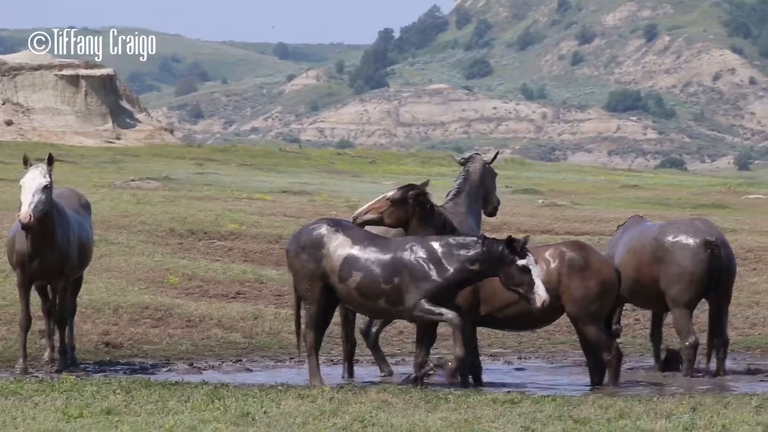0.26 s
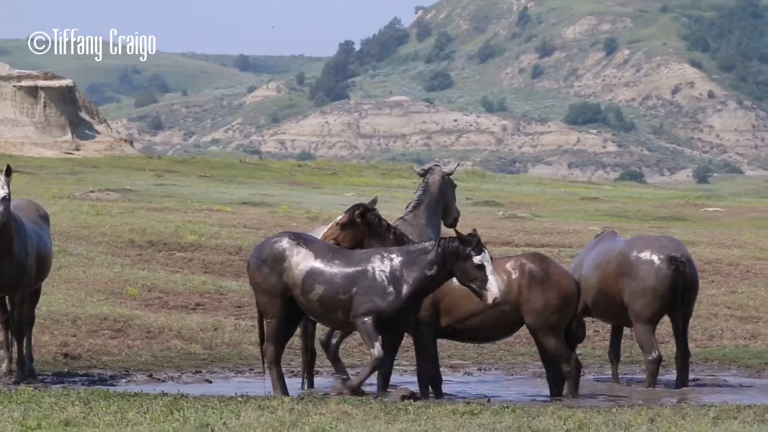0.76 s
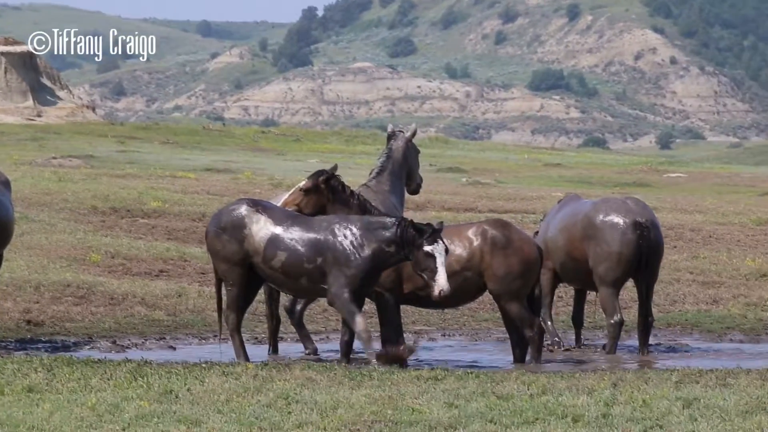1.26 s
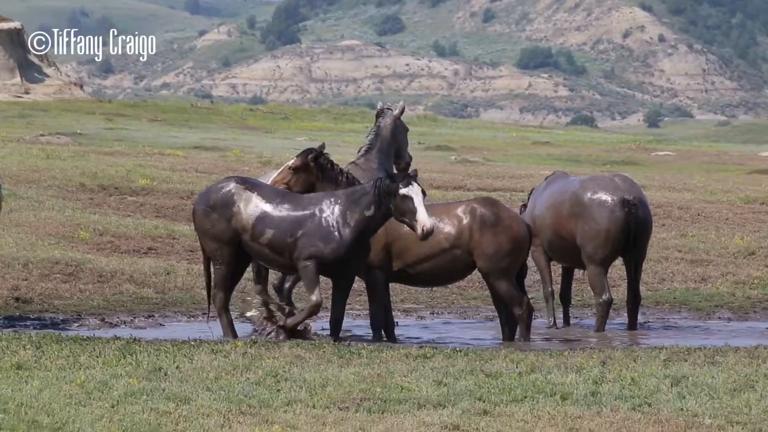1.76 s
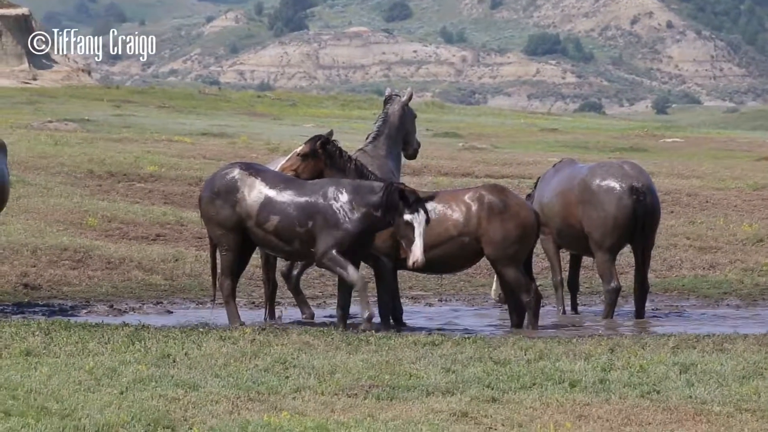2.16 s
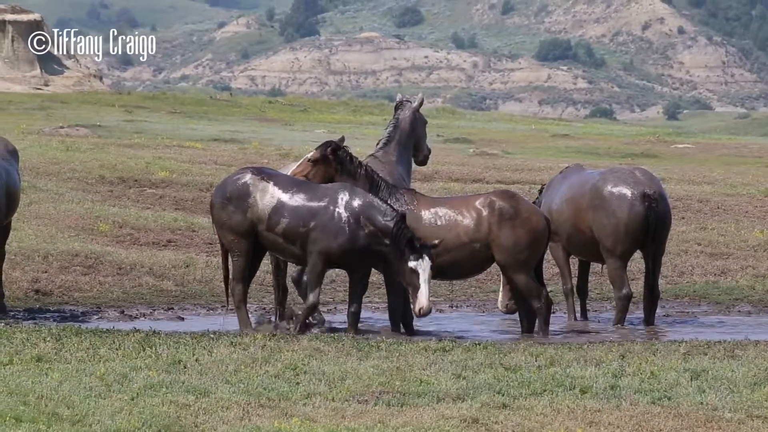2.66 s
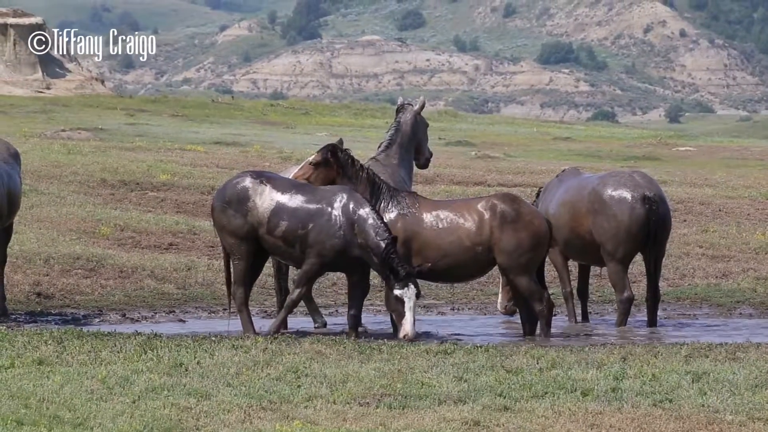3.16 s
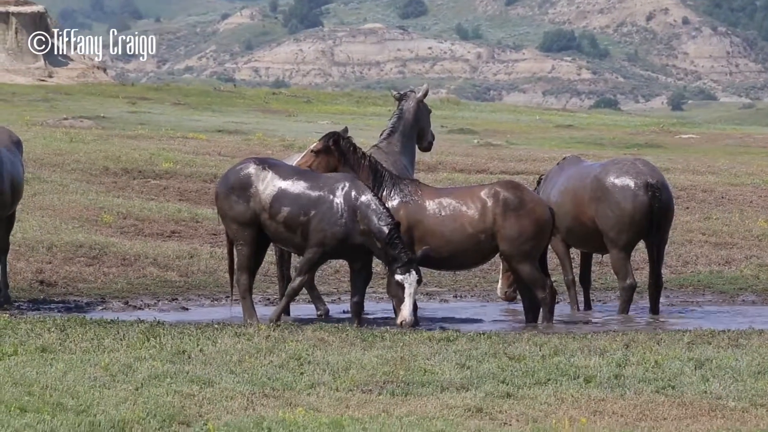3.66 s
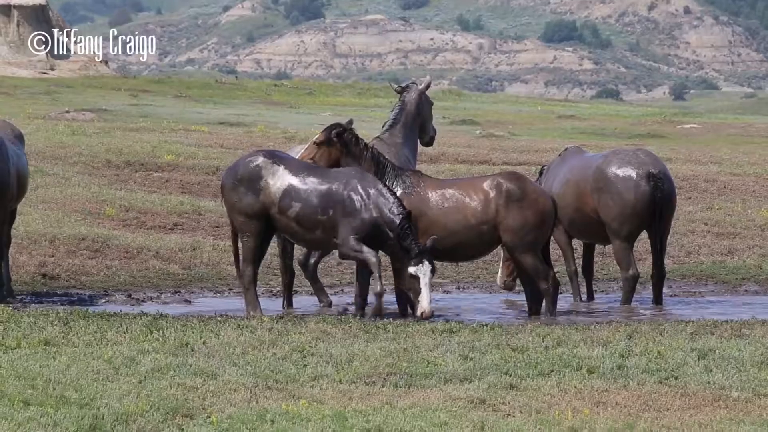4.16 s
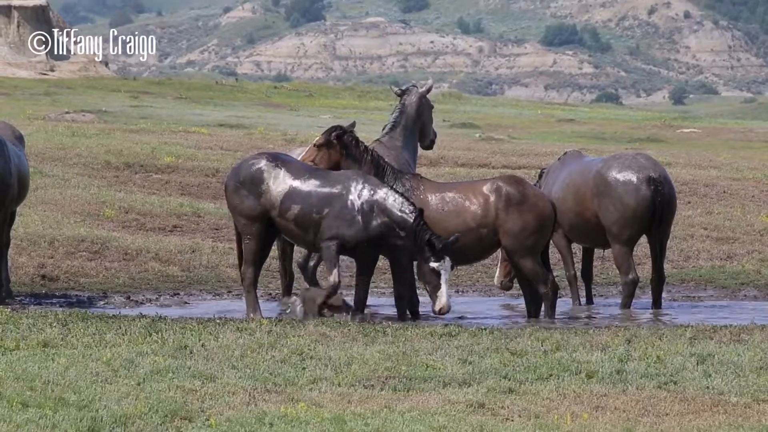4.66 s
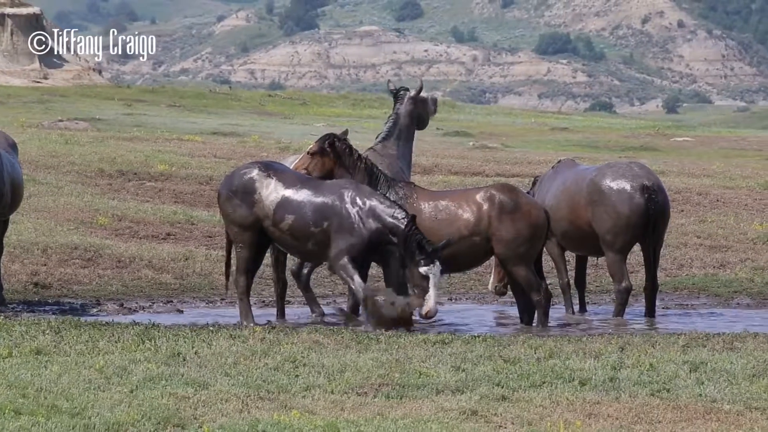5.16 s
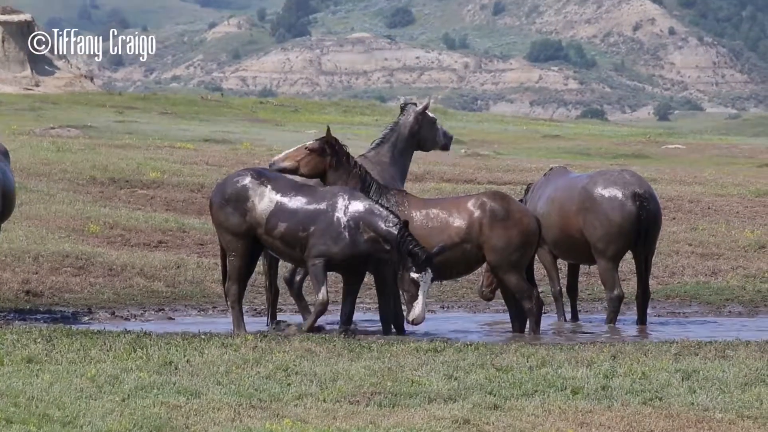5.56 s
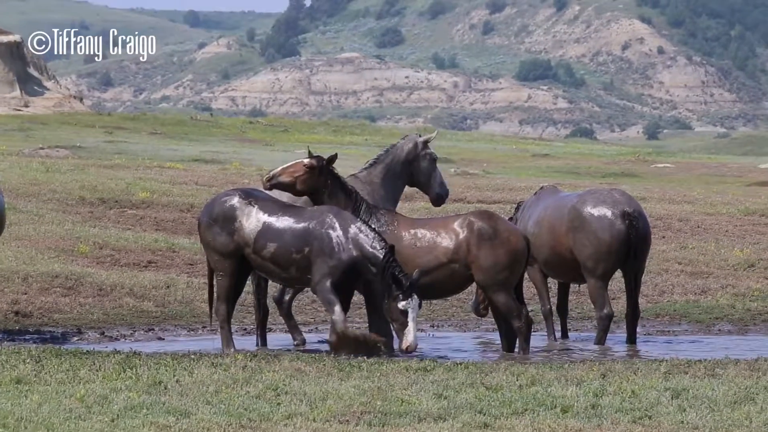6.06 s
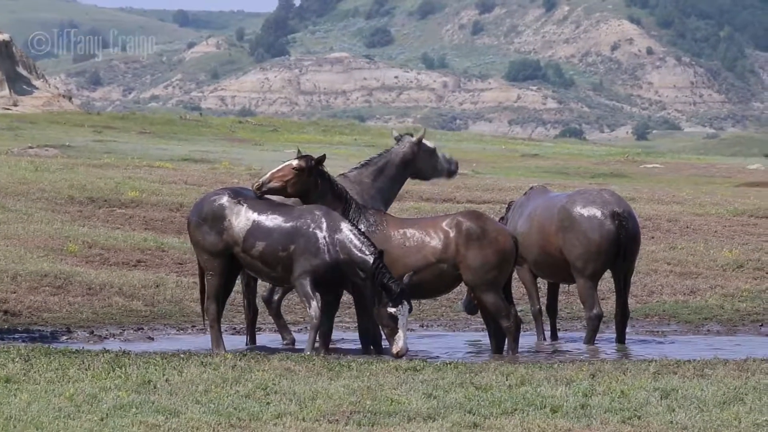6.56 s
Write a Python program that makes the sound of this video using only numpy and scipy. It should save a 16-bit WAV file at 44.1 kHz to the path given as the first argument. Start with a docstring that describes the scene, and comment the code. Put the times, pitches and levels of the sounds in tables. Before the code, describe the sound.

Short high chirps, each a twentieth of a second and slightly falling at the end, repeat steadily in the foreground. Horses paw mud and water behind them: splashy swishes, low bubbling plops, a few wet slaps and faint soft thuds. The outdoor space is open and nearly dry, with faint distant whistles. Close handling-like ticks, resonant whirring, hiss and a very high steady tone come from the camera.

```python
"""Prairie dog alarm by a muddy pool

Open grassland: a prairie dog barks about three times a second, arched whistles with a higher second voice.
Horses paw a pool: puffs of shaped noise slosh and spray, rising tones plop, bursts slap, low swings thud.
Close to the microphone the camera's drive whirrs as resonant noise; short dry ticks fall over it, and its
circuit whines high up, a steady tone. Faint whistles come from far off; shaped noise makes the light wind
and the microphone's hiss."""
import sys
import numpy as np
from scipy import signal
from scipy.fft import rfft, irfft, next_fast_len
from scipy.io import wavfile
from scipy.ndimage import uniform_filter1d

SR = 44100
rng = np.random.default_rng(int(sys.argv[2]) if len(sys.argv) > 2 else 0)


def pcm_store(signal):
    """Save signal as 16-bit PCM."""
    levels = np.round(np.clip(np.atleast_2d(signal), -1, 1) * 32767)
    wavfile.write(sys.argv[1], SR, levels.astype(np.int16).T)


N = 299880


def undb(db):
    """Gain of a level in dB."""
    return 10 ** (np.asarray(db) / 20)


def unit(x):
    """Scale to rms 1."""
    return x / np.sqrt(np.mean(x ** 2))


def colour(x, points):
    """Shape a spectrum by (frequency [Hz], gain [dB]) points, joined on a log frequency axis."""
    hz, db = np.transpose(points)
    size = next_fast_len(N)
    axis = np.log(np.arange(size // 2 + 1) * SR / size + 1)
    gain = undb(np.interp(axis, np.log(hz), db))
    return irfft(rfft(x, size) * gain, size)[:N]


def walk(rate, count=N):
    """Random levels held 1 / rate s and slewed twice; spread near 1."""
    k = int(SR / rate)
    steps = np.repeat(rng.standard_normal(count // k + 1), k)
    return 1.3 * uniform_filter1d(uniform_filter1d(steps, k), k)[:count]


def grains(per_s, spread_db, smear_s):
    """Noise broken into short puffs of uneven size, whose energy fades over smear_s."""
    where = rng.random(N)
    size = np.minimum(rng.exponential(size=N), 2.5)
    hits = (where < per_s / SR) * undb(2 * spread_db * size)
    keep = np.exp(-1 / (smear_s * SR))
    envelope = np.sqrt(signal.lfilter([1], [1, -keep], hits))
    return envelope * rng.standard_normal(N)


def add(out, s, x):
    """Mix x into out at time s."""
    i = max(int(s * SR), 0)
    out[i:i + len(x)] += x[:N - i]


# Resonances of the camera body: (frequency [Hz], width of one pass [Hz], gain [dB])
HOUSING = [(381, 160, 1), (487.4, 194, 6), (621, 138, -0.5), (1639.3, 149, 6), (2356, 151, 0.5),
           (2757, 133, 1), (3460, 177, -3), (4200, 900, -68)]


def housing(x):
    """The resonances of the camera body, each applied twice so the valleys stay dark."""
    out = 0
    for hz, width, db in HOUSING:
        b, a = signal.iirpeak(hz, hz / width, SR)
        once = signal.lfilter(b, a, x)
        out = out + undb(db) * signal.lfilter(b, a, once)
    return out


# Stirring of the pool, levels before surges and body ring:
# (time [s], slosh level [dB], spray level [dB], churned mud level [dB])
POOL = [(0.0, -57.5, -56, -78), (0.3, -51.5, -56, -80), (0.55, -54.5, -59, -84), (0.87, -54, -59.5, -61),
        (1.12, -49.5, -59, -58), (1.35, -56, -57, -67), (1.7, -58.5, -62.5, -63), (2.06, -51, -53, -60.5),
        (2.48, -58.5, -58, -70.5), (2.9, -54.5, -54, -51), (3.11, -55, -54, -60.5), (3.45, -62.5, -67, -69),
        (4.05, -61, -73, -65.5), (4.49, -59.5, -62.5, -65), (4.98, -53, -60, -58.5),
        (5.27, -54, -53.5, -66), (5.68, -58, -64, -56), (5.95, -54, -59, -62), (6.2, -55, -57, -72),
        (6.45, -57, -68.5, -62.5), (6.8, -58, -63.5, -70)]
# Spectra of the moving water and of the fine spray: (frequency [Hz], relative gain [dB])
SLOSH = [(100, -28), (250, -2), (500, -2.5), (1000, -3), (2000, -1.5), (3800, -7), (4700, -17.5),
         (5300, -49), (9000, -29)]
SPRAY = [(2000, 2.5), (4400, 1), (5300, -6), (6500, -3), (9000, -6), (12000, -14), (15000, -32)]
MUD = [(40, -39), (90, -8.5), (220, 2), (400, 0.5), (2000, -24)]  # (frequency [Hz], relative gain [dB])
SURGE_DB, SURGES_PER_S = 2, 18  # the water comes in uneven surges


def pool():
    """Hooves stir the pool: sloshing, fine spray and a low churn of mud, each made of noise puffs."""
    s, *columns = np.transpose(POOL)
    t = np.arange(N) / SR
    slosh_db, spray_db, mud_db = (np.interp(t, s, c) + SURGE_DB * walk(SURGES_PER_S) for c in columns)
    water = colour(grains(600, spread_db=5.0, smear_s=0.0088), SLOSH)
    # the camera body rings along and lends the water its colour
    slosh = (unit(water) + 0.57 * unit(housing(water))) * undb(slosh_db)
    spray = unit(colour(grains(900, spread_db=0.5, smear_s=0.0034), SPRAY)) * undb(spray_db)
    mud = unit(colour(grains(110, spread_db=0.5, smear_s=0.038), MUD)) * undb(mud_db)
    return slosh + spray + mud


# Spectrum of wind and hiss at the microphone: (frequency [Hz], relative gain [dB])
AIR = [(20, -13), (45, 2), (72, 7.5), (110, 3.5), (250, -6), (700, 2), (1000, -27), (1400, 6.5),
       (2000, -34), (4000, -68), (5200, -21.5), (13000, -22), (14300, -21), (14800, -26), (15200, -28)]
AIR_DB = -63.5  # rms


def air():
    """Light wind over the plain and the hiss of the microphone: steady shaped noise."""
    return unit(colour(rng.standard_normal(N), AIR)) * undb(AIR_DB)


FAINT_TICKS_PER_S, FIRST_TICK_S, TICK_JITTER_S = 23.44, 0.006, 0.003
FAINT_SNAP_DB, FAINT_RING_DB, FAINT_SPREAD_DB = -54.5, -45, 2.5  # before the tick's colouring


def faint_ticks():
    """One faint tick of random size about every 43 ms."""
    times = np.arange(FIRST_TICK_S, N / SR, 1 / FAINT_TICKS_PER_S)
    late, snap, ring = rng.standard_normal((len(times), 3)).T
    times = times + TICK_JITTER_S * late
    snap_db = FAINT_SNAP_DB + FAINT_SPREAD_DB * snap
    ring_db = FAINT_RING_DB + FAINT_SPREAD_DB * ring
    return list(zip(times, snap_db, ring_db))


# Louder short ticks, levels before colouring:
# (time [s], dry snap level [dB], level sent through the resonances [dB])
TICKS = [(0.2134, -44, -45), (0.379, -46, -29), (0.4179, -46, -46), (0.5104, -45, -36),
         (0.7307, -39.5, -27), (0.835, -41.5, -46), (1.227, -44, -32), (1.249, -42, -30),
         (1.4117, -40, -26.5), (1.4722, -34, -46), (1.499, -43, -48), (1.6181, -42, -26),
         (1.7977, -41, -46), (1.838, -37.5, -46), (1.8775, -42, -23.5), (1.924, -41, -39),
         (1.9866, -43, -46), (2.2591, -42, -29), (2.6435, -41, -55), (3.197, -39, -49),
         (3.2869, -41.5, -27), (3.4287, -41, -29), (3.5458, -44, -30.5), (3.8049, -43.5, -26),
         (3.979, -43.5, -31), (4.099, -43.5, -54), (4.2268, -43, -30), (4.4413, -44, -45),
         (4.4588, -41, -50), (4.567, -43.5, -30), (4.6055, -40, -24), (4.823, -43, -44), (5.4814, -46, -56),
         (5.7203, -41, -48), (6.099, -44, -25), (6.1413, -42, -40), (6.4918, -43, -50), (6.5336, -43, -28),
         (6.6612, -44, -49), (6.7431, -40.5, -36)]
SNAP = [(1000, 8.5), (2500, 20.5), (4500, 7.5), (6000, 6), (10000, -2.0), (14000, -4)]  # (frequency [Hz], gain [dB])
RING = [(600, 2.3), (1500, 10.5), (4000, 8.9)]  # (frequency [Hz], gain [dB])
CHATTER_S = 0.0026  # fade of a tick's chatter
WHIRR_DB, WHINE_DB, WHINE_HZ = -54.5, -54.5, 15620.6  # mean rms levels, before their slow wander


def camera():
    """Close by, the camera's drive whirrs; short dry ticks fall over it, and its circuit whines."""
    rattle = unit(housing(grains(500, spread_db=2.0, smear_s=0.0012)))
    whirr = rattle * undb(WHIRR_DB + 1.0 * walk(2.86))
    snap, ring = np.zeros(N), np.zeros(N)
    t = np.arange(800) / SR
    for s, snap_db, ring_db in TICKS + faint_ticks():
        puff = .3 * rng.standard_normal(len(t)) * np.exp(-t / CHATTER_S)
        puff[0] = 1  # one sharp edge, then a little chatter
        add(snap, s, undb(snap_db) * puff)
        add(ring, s, undb(ring_db) * puff)
    snap = colour(snap, SNAP)
    ring = housing(colour(ring, RING))
    tone = np.sqrt(2) * np.sin(2 * np.pi * WHINE_HZ * np.arange(N) / SR)
    whine = undb(WHINE_DB + .45 * walk(5.1)) * tone
    return whirr + snap + ring + whine


# Soft low thuds on the ground: (time [s], pitch [Hz], level [dB])
THUDS = [(0.044, 55, -53), (0.442, 54, -58), (0.826, 55, -57), (2.867, 50, -53), (3.962, 50, -56),
         (4.978, 55, -57), (5.3, 60, -59), (6.536, 90, -56), (6.639, 89, -53)]
THUD_S = 0.045


def thuds():
    """Hooves set down on soft ground: two to four slow swings each, swelling and dying away."""
    out = np.zeros(N)
    for s, hz, db in THUDS:
        t = np.arange(int(THUD_S * SR)) / SR
        swell = np.sin(np.pi * t / THUD_S) ** 2
        add(out, s, undb(db) * swell * np.sin(2 * np.pi * hz * t))
    return out


SCATTER_DB, SCATTER_S = -25.5, 0.019  # level and fade of the return


def scatter(x):
    """Grass and mounds return a faint, short smear."""
    t = np.arange(int(5 * SCATTER_S * SR)) / SR
    tail = rng.standard_normal(len(t)) * np.exp(-t / SCATTER_S)
    tail = tail / np.linalg.norm(tail)
    return x + undb(SCATTER_DB) * signal.fftconvolve(x, tail)[:N]


# Barks across the grass, levels before the throat's dip: (time [s], length [s], top pitch [Hz],
# last pitch [Hz], first partial's level [dB], partials 2, 3 and 4 against the first [dB] x 3,
# second voice's level mid-bark [dB])
BARKS = [(0.2605, 0.054, 2248, 1896, -28, -3, -20, -41, -12.5),
         (0.6209, 0.051, 2216, 1860, -26, -2.5, -17.5, -32, -15.5),
         (0.9248, 0.054, 2244, 1866, -26.5, -1.5, -17.5, -34, -16.5),
         (1.2846, 0.051, 2219, 1865, -25.5, -1.5, -16.5, -35, -16),
         (1.65, 0.049, 2214, 1920, -28, 0.5, -13.5, -27.5, -17),
         (2.027, 0.045, 2181, 1940, -28, 1, -10, -26.5, -15.5),
         (2.377, 0.051, 2187, 1975, -26.5, 0.5, -14.5, -29.5, -17),
         (2.6974, 0.047, 2230, 1890, -25, -2, -18, -36, -18.5),
         (3.0367, 0.044, 2206, 1900, -25.5, -1.5, -19.5, -47, -21),
         (3.37, 0.048, 2160, 1920, -26.5, -2.5, -21.5, -39.5, -18),
         (3.687, 0.043, 2147, 2090, -27.5, -2, -18, -34, -22),
         (4.348, 0.043, 2125, 2090, -26.5, -1.5, -16, -24, -27),
         (4.6765, 0.0435, 2062, 2010, -30, -1.5, -18.5, -26.5, -15.5),
         (4.999, 0.043, 2150, 2020, -25.5, -7.5, -22.5, -35, -19),
         (5.297, 0.047, 2123, 1990, -27, -10.5, -21.5, -31, -15.5),
         (5.607, 0.049, 2084, 1910, -28, -8.5, -20, -39, -15),
         (5.9453, 0.042, 2028, 1940, -31, -8, -21.5, -29.5, -11.5),
         (6.2461, 0.041, 2086, 2125, -26.5, -6.5, -21.5, -29, -16),
         (6.556, 0.045, 2128, 1840, -24.5, -7.5, -20, -34.5, -16.5)]
# A dip in the throat above the second partial: (frequency [Hz], gain [dB])
THROAT = [(3000, -2), (4900, 0), (5400, -14), (5900, -1.5), (6200, -1)]
# Partials 5 and 6 against the mean of the third and fourth: (level [dB], level [dB])
TOP_PARTIALS_DB = [-12, -21.5]
SCOOP_HZ = 103  # the main arch starts this far under its top
SECOND_SHARE = 0.238  # second voice above the first, as a share of the pitch
SECOND_GROWS_DB = 3  # its growth over each half of a bark


def prairie_dog(top_at=.35, breath_db=-19.5):
    """Arched whistle-like barks; a second, higher voice puts a side tone above every partial."""
    out = np.zeros(N)
    for s, length, top_hz, last_hz, db, *upper_db, voice2_db in BARKS:
        u = np.arange(int(length * SR)) / (length * SR)  # 0 to 1 over the bark
        count = len(u)
        rising = u < top_at
        edge_hz = np.where(rising, top_hz - SCOOP_HZ, last_hz)
        reach = np.where(rising, (top_at - u) / top_at, (u - top_at) / (1 - top_at))
        arch = reach ** np.where(rising, 2.6, 2.1)
        hz = top_hz + (edge_hz - top_hz) * arch + 12 * walk(349, count=count)
        # quick scoop up at the start; flat barks hook down at the very end
        hook_hz = max(260 - 1.0 * (top_hz - last_hz), 0)
        hz -= np.where(rising, 50, hook_hz) * reach ** 7
        phase = 2 * np.pi * np.cumsum(hz) / SR
        beat = 2 * np.pi * np.cumsum(SECOND_SHARE * hz + 60 * walk(400, count=count)) / SR

        # the second voice fades in over the first quarter; a weaker mirror tone lies below
        second_db = voice2_db + SECOND_GROWS_DB * (2 * u - 1)
        second = undb(second_db + 2.5 * walk(250, count=count)) * np.clip(u / .25, 0, 1)
        wobble = 1 + second * (np.exp(1j * beat) + 0.22 * np.exp(-1j * beat))
        fade_in = np.sin(np.pi / 2 * np.clip(u / 0.11, 0, 1))
        fade_out = np.sin(np.pi / 2 * np.clip((1 - u) / 0.094, 0, 1))

        # quick onset, rounded middle; the lowest partial dies first as the pitch drops
        rise_db = [-44, -35, -42, -53, -30, -22]
        droop_db = [-52.0, -16.5, -39, 6, -19, -42]
        top_partials_db = [np.mean(upper_db[-2:]) + top_db for top_db in TOP_PARTIALS_DB]
        levels = db + np.array([0, *upper_db] + top_partials_db)
        bark = 0
        for k, (partial_db, rise, droop) in enumerate(zip(levels, rise_db, droop_db)):
            before = rise * np.minimum(u - .42, 0) ** 2
            after = droop * np.maximum(u - .42, 0) ** 1.78
            shape = undb(partial_db + before + after + 1.22 * walk(306, count=count))
            # turbulent air blurs each partial, the higher ones more
            slow_blur = walk(900, count=count) + 1j * walk(820, count=count)
            fast_blur = walk(4000, count=count) + 1j * walk(4000, count=count)
            breath_gain = undb(breath_db + 5.5 * k + .5 * (second_db + 15))
            breath = breath_gain * (slow_blur + 0.48 * fast_blur) * np.exp(.5j * beat)
            # the second partial lines up with the troughs, so the wave hangs downward
            carrier = np.exp(1j * (k + 1) * (phase + np.pi) + 1j * np.pi * (k == 0))
            bark = bark - shape * np.real((wobble + breath) * carrier)
        add(out, s, fade_in * fade_out * bark)
    return scatter(colour(out, THROAT))


# Faint calls from far off, levels before swell and blur:
# (time [s], length [s], top pitch [Hz], depth of the pitch arch [Hz], level [dB])
FAR_CALLS = [(0.297, 0.45, 3090, 454, -62), (6.332, 0.076, 3240, 500, -61), (6.676, 0.066, 3100, 500, -59)]


def far_calls():
    """Arched whistles, blurred by distance."""
    out = np.zeros(N)
    for s, length, top_hz, arch_hz, db in FAR_CALLS:
        u = np.arange(int(length * SR)) / (length * SR)
        phase = 2 * np.pi * np.cumsum(top_hz - arch_hz * (2 * u - 1) ** 2) / SR
        blur = .6 + walk(700, count=len(u))
        swell = np.sin(np.pi * u)
        add(out, s, undb(db) * np.sqrt(2) * swell * blur * np.sin(phase))
    return out


# Plops in the pool's mud: (time [s], starting pitch [Hz], peak level [dB])
PLOPS = [(0.324, 1240, -42), (0.601, 1310, -40.5), (0.715, 350, -47), (1.041, 108, -50), (1.075, 177, -45),
         (1.111, 115, -45.5), (1.19, 109, -53.5), (1.604, 222, -43.5), (1.683, 347, -37), (1.801, 192, -49),
         (2.029, 181, -49), (2.752, 573, -39), (2.754, 215, -32), (2.855, 222, -48), (2.896, 231, -45),
         (2.955, 338, -45), (3.025, 684, -47), (4.766, 510, -42), (5.049, 228, -48.5), (5.285, 710, -44),
         (5.298, 960, -45), (5.372, 520, -39.5), (5.478, 288, -46), (5.899, 198, -46), (6.31, 360, -46.5),
         (6.382, 333, -42)]
PLOP_FADE_S, PLOP_REF_HZ = 0.012, 296  # fade at this pitch; bigger pockets ring lower and longer
PLOP_SWELL = 0.45  # swell as a share of the fade
PLOP_RISE = 0.053  # rise in pitch over two fades, as a share


def plops():
    """Pockets of air in the mud ring briefly, rising as they close."""
    out = np.zeros(N)
    for s, hz, db in PLOPS:
        fade = PLOP_FADE_S * (PLOP_REF_HZ / hz) ** 0.53
        swell = PLOP_SWELL * fade
        t = np.arange(int((swell + 5 * fade) * SR)) / SR
        shape = np.clip(t / swell, 0, 1) * np.exp(-(np.maximum(t - swell, 0) / fade) ** 1.75)
        rising_hz = hz * (1 + PLOP_RISE * (t / fade) / 2)
        add(out, s, undb(db) * shape * np.sin(2 * np.pi * np.cumsum(rising_hz) / SR))
    return out


# A hoof slaps the water, levels before the band is cut out and widened to make up for it:
# (time [s], crack level [dB], wash level [dB], wash fade [s], low edge [Hz], high edge [Hz])
SLAPS = [(1.075, -52, -51, 0.093, 80, 500), (1.585, -40.5, -47, 0.0076, 347, 1000),
         (2.955, -45, -51, 0.024, 200, 900), (3.027, -48, -47, 0.0074, 400, 1500),
         (4.769, -34, -44, 0.025, 302, 935), (5.283, -45, -46.5, 0.043, 390, 1390),
         (5.372, -49, -57, 0.022, 348, 880)]


def slaps():
    """A single crack, then water washing back as fading noise, both held to one band."""
    out = np.zeros(N)
    for s, crack_db, wash_db, fade, low_hz, high_hz in SLAPS:
        t = np.arange(int(5 * fade * SR)) / SR
        wide = np.sqrt(SR / 2 / (high_hz - low_hz))  # keeps the level when the band is cut out
        burst = undb(wash_db) * wide * np.exp(-t / fade) * rng.standard_normal(len(t))
        burst[0] = undb(crack_db) * wide ** 2
        band = signal.butter(2, [low_hz, high_hz], "band", fs=SR, output="sos")
        add(out, s, signal.sosfilt(band, burst))
    return out


def scene():
    """Everything as one microphone hears it."""
    water = pool() + plops() + slaps()
    calls = prairie_dog() + far_calls()
    return (water + air() + camera() + thuds() + calls)[None]


TOP_HZ = 15720


def record(dry):
    """The recorder cuts the top steeply."""
    return signal.sosfilt(signal.ellip(12, .2, 60, TOP_HZ, fs=SR, output="sos"), dry)


dry = scene()
out = record(dry)
pcm_store(out)
```